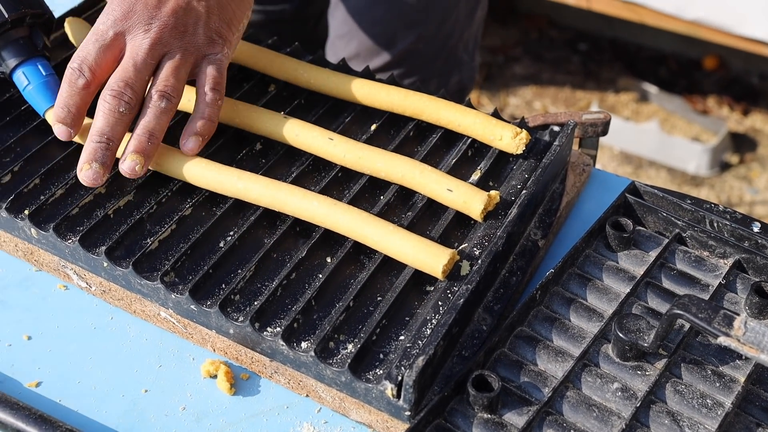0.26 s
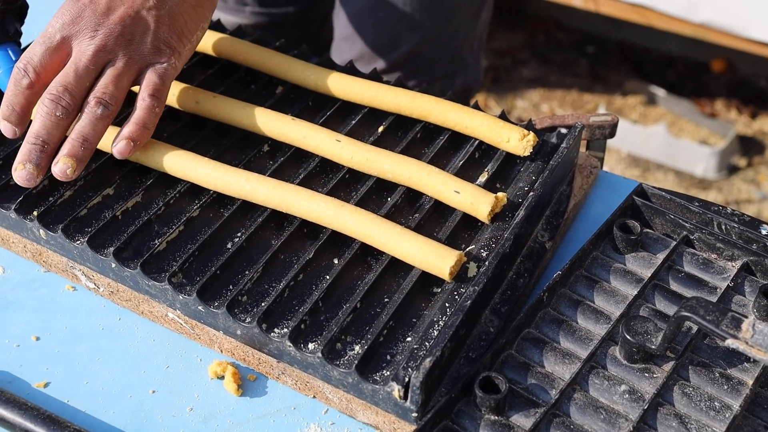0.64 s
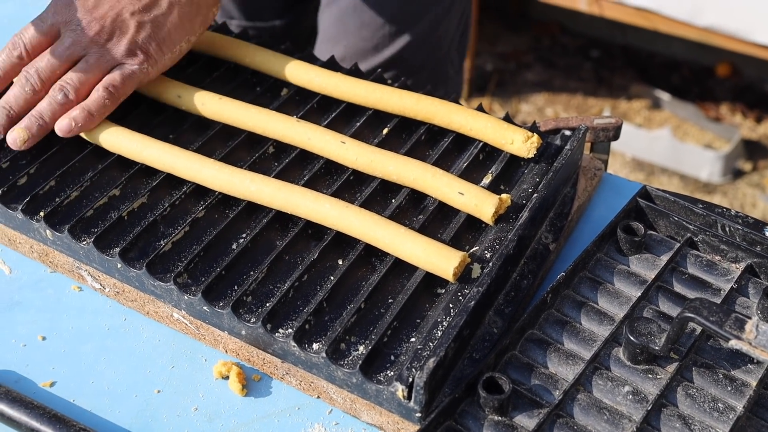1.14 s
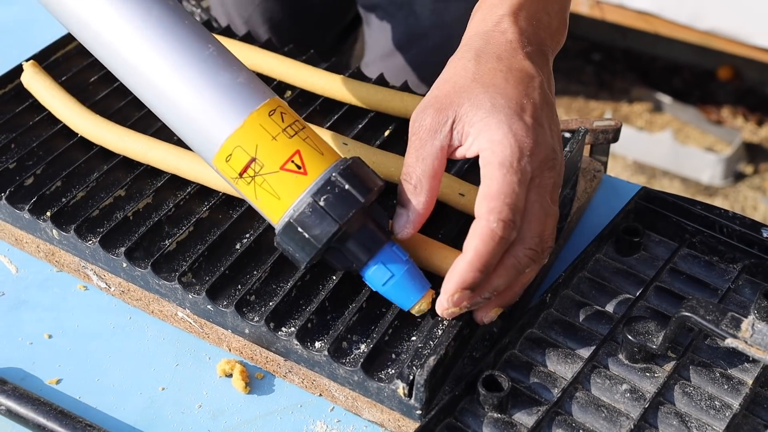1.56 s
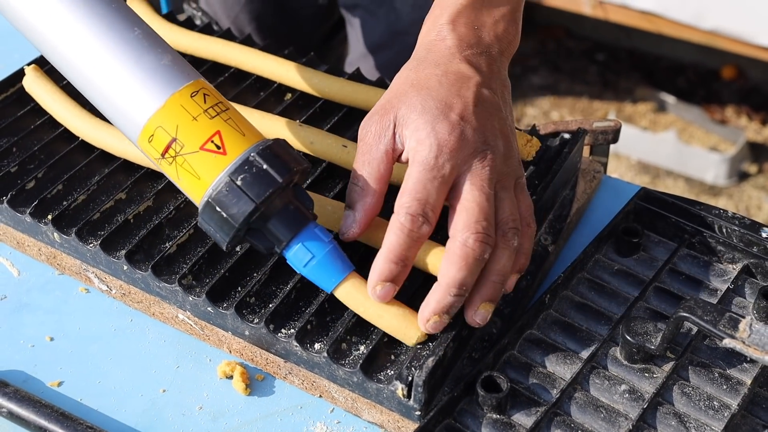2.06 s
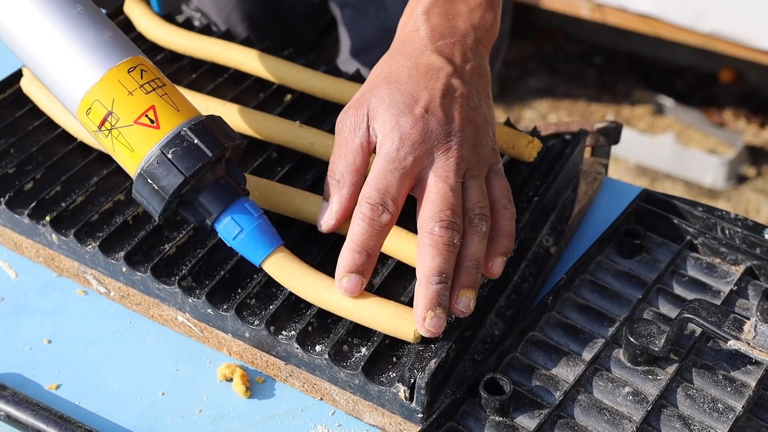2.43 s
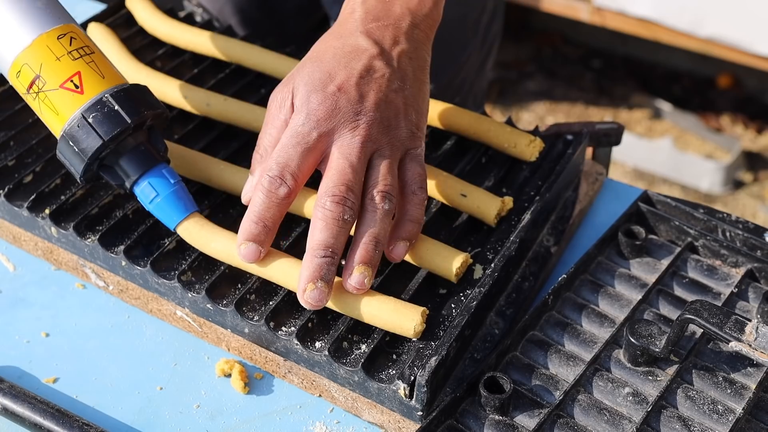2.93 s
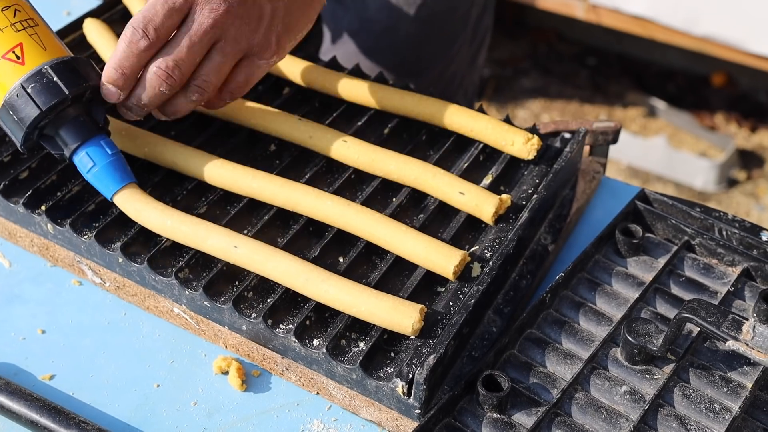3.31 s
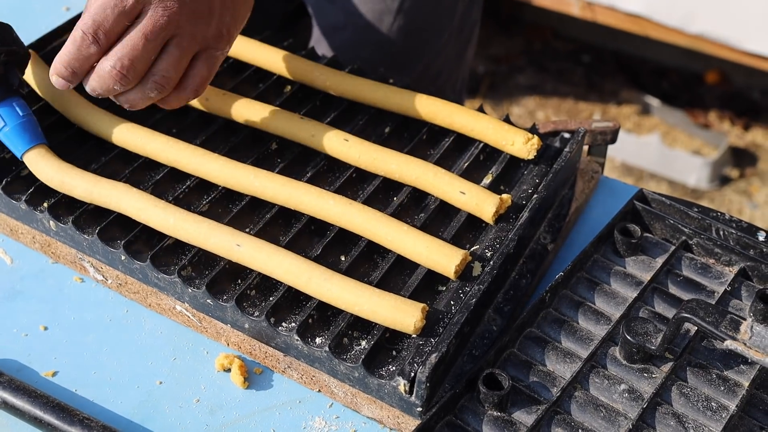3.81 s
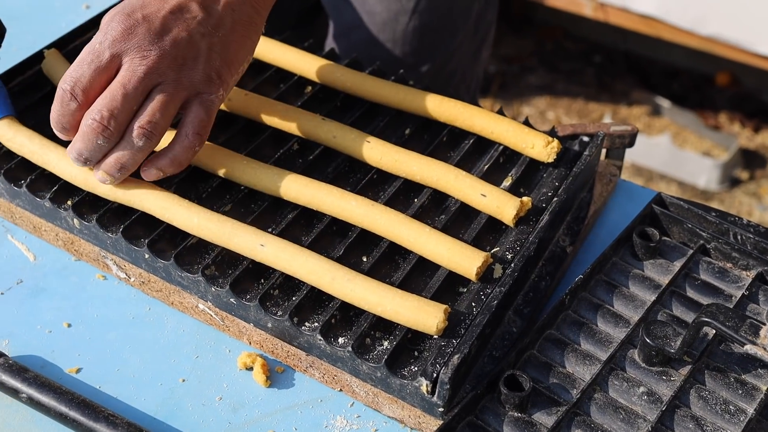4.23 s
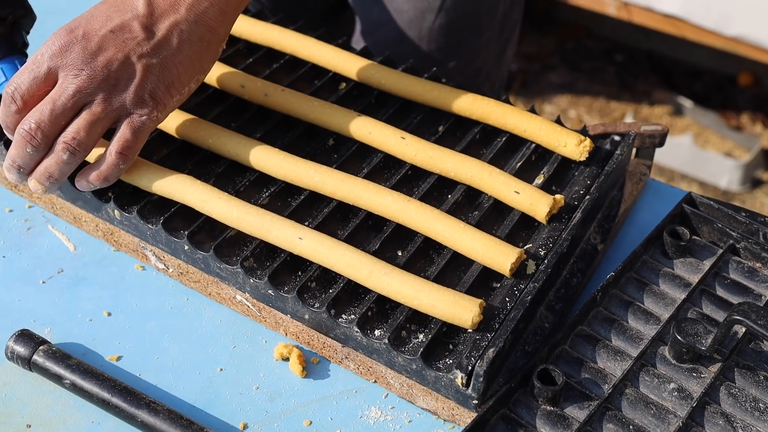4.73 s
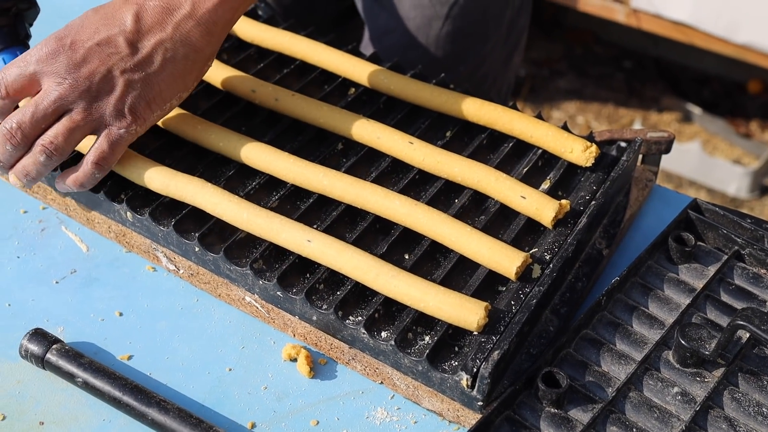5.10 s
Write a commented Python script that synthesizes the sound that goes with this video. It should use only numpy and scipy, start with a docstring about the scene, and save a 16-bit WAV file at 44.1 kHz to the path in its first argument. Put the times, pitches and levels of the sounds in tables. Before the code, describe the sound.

Air-powered gun vents explosively at about one, four and a half and five seconds; soft high hiss and hard clicks fill the gaps.

```python
"""Three air blasts overload the converter; hisses, snaps, knocks, rubs and far chirps fill the gaps outdoors.
A hand works the trigger of an air-driven paste gun beside a stereo microphone.
Blasts, barrel air, rubbing and the yard's hush are shaped noise; trigger snaps and knocks of the gun,
hose and tray are damped modes; bird chirps and a squeak of slipping paste are gliding sines."""
import sys
import numpy as np
from scipy import signal
from scipy.fft import rfft, irfft
from scipy.io import wavfile
from scipy.ndimage import uniform_filter1d

SR = 44100
rng = np.random.default_rng(int(sys.argv[2]) if len(sys.argv) > 2 else 0)


def to_wav(sig):
    """Store sig (one row per channel, or 1-D mono) as 16-bit WAV at the path in sys.argv[1].

    Samples outside -1..1 are clipped; the rate is SR.
    """
    pcm = np.clip(np.atleast_2d(sig), -1, 1) * 32767
    pcm = np.round(pcm).astype(np.int16)
    wavfile.write(sys.argv[1], SR, pcm.T)  # frames by channels


N = 236640

# hiss and rubbing: (frequency [Hz], left-right correlation [-1 to 1])
HISS_LIKENESS = [(60, 0.88), (240, 0.63), (950, 0.98), (3770, 0.24), (15000, 0.12)]


def amp(db):
    """Decibels to gain."""
    return 10 ** (np.asarray(db) / 20)


def left_right(left_over_right_db):
    """Splits a level difference into one dB offset per channel."""
    return np.outer([.5, -.5], left_over_right_db)


def evened(x):
    """Scales to an rms of one."""
    return x / np.sqrt(np.mean(x ** 2) + 1e-20)


def read(points, hz):
    """Reads a table on a log-frequency axis."""
    f, value = np.transpose(points)
    return np.interp(np.log(hz + 1), np.log(f + 1), value)


def add(mix, s, sound):
    """Mixes a two-channel sound in at time s."""
    part = mix[:, round(s * SR):][:, :sound.shape[1]]
    part += sound[:, :part.shape[1]]


def high_pass(x, hz):
    """Second-order bass cut."""
    return signal.sosfilt(signal.butter(2, hz, "high", fs=SR, output="sos"), x)


def noise(tone, likeness, patchy_db, count):
    """Two-channel noise from random short-time spectra with drifting patches, at an rms of one."""
    frames = count // 256 + 5
    hz = np.fft.rfftfreq(1024, 1 / SR)
    a, b, c, d, patches = rng.standard_normal((frames, 513, 5)).T
    patches = uniform_filter1d(patches, size=12, axis=0)
    patches = evened(uniform_filter1d(patches, size=12, axis=1))
    alike = np.clip(read(likeness, hz), -1, 1)[:, None]
    left = a + 1j * b
    right = alike * left + np.sqrt(1 - alike ** 2) * (c + 1j * d)
    spectra = np.array([left, right]) * amp(read(tone, hz)[:, None] + patchy_db * patches)
    return evened(signal.istft(spectra, nperseg=1024, noverlap=768)[1][:, :count])


def hush():
    """The yard's steady background: quiet, partly shared noise."""
    # (frequency [Hz], relative level [dB per Hz])
    tone = [(18, -63), (30, -35), (75, -6), (115, -11), (225, -6.5), (361, -6.5), (401, -2.5), (433, -6.5),
            (469, -4), (771, -8), (1480, -7), (1930, -11), (2380, -5.5), (3340, -8.5), (6100, -10.5),
            (15700, -18)]
    # (frequency [Hz], left-right correlation [-1 to 1])
    likeness = [(60, 0.72), (180, 0.95), (550, 0.73), (1650, 0.51), (4970, -0.31), (15000, -0.21)]
    level_db = -55
    return amp(level_db) * noise(tone, likeness, patchy_db=0.32, count=N)


def whistle(length_s, start_hz, end_hz, peak_db):
    """A thin gliding tone: a sine under a smooth swell, alike in both channels."""
    hz = np.linspace(start_hz, end_hz, round(length_s * SR))
    tone = np.sin(2 * np.pi * np.cumsum(hz) / SR) * np.hanning(len(hz))
    return amp(peak_db) * np.tile(tone, (2, 1))


def blast(open_s, lead_s, leak_db, shut_s, shutting_s, strength_db):
    """A bright jet at the vent, and a roar that dies bass first as the barrel empties."""
    # (frequency [Hz], relative level [dB per Hz])
    jet_tone = [(300, -60), (800, -32), (1600, -23), (2400, -16.5), (3200, -13.5), (4000, -8), (6200, -5.5),
                (7600, -1.5), (9500, -2.5), (12000, -4), (16000, -5.5)]
    # (frequency [Hz], relative level [dB per Hz])
    roar_tone = [(30, 0), (100, -5), (250, 0.5), (700, -0.5), (1300, -2.5), (2500, -2.5), (4500, -4.5),
                 (8000, -22.5), (16000, -42.5)]
    # (frequency [Hz], left-right correlation [-1 to 1])
    jet_likeness = [(60, 0.02), (180, 0.15), (550, 0.041), (1650, 0.74), (4970, -0.13), (15000, -0.3)]
    # (frequency [Hz], left-right correlation [-1 to 1])
    roar_likeness = [(60, -0.14), (380, 0.35), (2380, 0.082), (15000, -0.07)]
    # (frequency [Hz], share that belongs to the jet's top [0 to 1])
    jet_top = [(6000, 0), (11000, 1)]
    roar_bands_hz, bass_fade = (100, 300, 1000, 3000), .17  # fades this share faster for each band down
    closed_db, crack_s, leak_db_per_s, pop_s = -36, .0035, 419, .003
    full_s, jet_sag_db_per_s2 = .05, 899
    roar_drop_db, roar_drop_s, roar_steep = 58, .08, 1.7
    cut_db, trail_db_per_s, trail_s, roar_shut = 39, 120, .2, .25
    top_lift, top_shut_db = .28, -6  # dB of lift per dB of choke; dulling once shut
    jet_left_db, top_left_db = 2, -2.5  # the top's offset adds to the jet's
    roar_left_db, swing_db, swing_s = -1.5, 9, .039

    t = np.arange(-lead_s, shut_s + shutting_s + trail_s, 1 / SR)
    count = len(t)
    hz = np.fft.rfftfreq(count, 1 / SR)

    # the leak swells, then the valve pops wide
    crack_db = closed_db * np.exp(-(t + lead_s) / crack_s)
    gap_db = np.minimum(crack_db + leak_db + leak_db_per_s * t, 0)
    choke_db = gap_db * np.clip(-t / pop_s, 0, 1)
    # shutting cuts the flow; a remnant trails off
    shut = np.sin(np.pi / 2 * np.clip((t - shut_s) / shutting_s, 0, 1)) ** 2
    shut_db = -cut_db * shut - trail_db_per_s * np.maximum(t - shut_s - shutting_s, 0)

    # after full pressure the jet sags ever faster until shutting starts
    spent_s = np.maximum(t - full_s, 0)
    sag_db = jet_sag_db_per_s2 * np.minimum(spent_s, shut_s - full_s) ** 2
    jet_db = strength_db + choke_db - sag_db + shut_db
    top_db = top_shut_db * shut - top_lift * choke_db + left_right(top_left_db)
    jet = noise(jet_tone, jet_likeness, patchy_db=1.5, count=count)
    top = irfft(rfft(jet) * read(jet_top, hz), count)
    jet = amp(jet_db) * (jet + (amp(top_db) - 1) * top)  # a narrow gap hisses higher

    # the roar is weak through a narrow gap and collapses after full pressure
    collapse_db = roar_drop_db * (1 - np.exp(-spent_s / roar_drop_s))
    roar_db = roar_steep * choke_db - collapse_db + roar_shut * shut_db
    spectrum = rfft(noise(roar_tone, roar_likeness, patchy_db=1.5, count=count))
    roar = 0
    for k, own in enumerate(np.eye(len(roar_bands_hz))[::-1]):  # highest band first
        share = read(list(zip(roar_bands_hz, own)), hz)  # overlapping bands that sum to one
        band = irfft(spectrum * share, count)
        roar = roar + amp(strength_db + (1 + k * bass_fade) * roar_db) * band
    # the dying roar swings left and back
    pan_db = roar_left_db + swing_db * spent_s / swing_s * np.exp(1 - spent_s / swing_s)
    return open_s - lead_s, jet * amp(left_right(jet_left_db)) + roar * amp(left_right(pan_db))


def rubbing():
    """Hand and paste dragged along the tray: a low, lumpy rustle swelling and fading with each stroke."""
    # (middle [s], half length [s], level [dB])
    stroke_rows = [(1.55, 0.31, -59.5), (2.45, 0.24, -61.5), (3.5, 0.41, -63.5), (5.1, .25, -62.5)]
    # (frequency [Hz], relative level [dB per Hz])
    tone = [(100, -25), (200, -4), (450, -1), (900, -0.5), (2000, -4), (4000, -16), (8000, -34)]
    t = np.arange(N) / SR
    strokes = sum(amp(db) * np.exp(-((t - s) / half_s) ** 2) for s, half_s, db in stroke_rows)
    return strokes * noise(tone, HISS_LIKENESS, patchy_db=2, count=N)


def knock(level_db, hz, t60_s):
    """A dull tap: a damped note with weaker, shorter overtones."""
    t = np.arange(6000) / SR
    ratio = np.array([[1], [1.6], [2.5], [4.1]])
    note_db = -5 * np.log2(ratio) - 60 * ratio ** .5 * t / max(t60_s, .005)
    notes = amp(note_db) * np.sin(2 * np.pi * ratio * hz * t)
    attack = np.minimum(t / .0013, 1)
    return amp(level_db) * np.tile(notes.sum(0), (2, 1)) * attack


def hiss(row, tone):
    """Turbulent air through a narrow valve, coloured by the passages around it."""
    close_db_per_s, left_db = 168, 2.5
    s, rise_s, level_db, steady_s, fade_db_per_s, close_s, length_s = row
    t = np.arange(0, length_s, 1 / SR)
    fade_db = fade_db_per_s * np.maximum(t - steady_s, 0)
    closing_db = close_db_per_s * np.maximum(t - close_s, 0)
    flow_db = level_db - fade_db - closing_db
    rise = (1 - np.exp(-t / rise_s)) ** 2
    air = noise(tone, HISS_LIKENESS, patchy_db=1.7, count=len(t))
    air = air * signal.windows.tukey(len(t), .02)
    return s, air * rise * amp(flow_db + left_right(left_db))


def snap(peak_db, treble_db, left_db, tail_db):
    """Trigger modes ring some two milliseconds until the finger damps them; surfaces scatter a tail."""
    # (frequency [Hz], level before tilt [dB])
    trigger_modes = [(590, -2.5), (950, -7), (1350, 0.5), (1600, -7.5), (2300, 1), (2800, -6.5),
                     (3600, -1.5), (4600, -2), (5600, -6), (6300, -1), (7400, -7), (8500, -4.5), (9400, 0),
                     (10500, -6.5), (11900, -6.5), (13000, -11), (14100, -11), (15200, -17)]
    t = np.arange(3000) / SR
    hz, db = np.transpose(trigger_modes)[:, :, None]
    tilt_db = treble_db * np.clip(np.log2(hz / 2000) / 2, 0, 1)
    start_s = rng.uniform(0, .00077, hz.shape) * (hz > 2000)  # parts rattle into place at scattered moments
    modes = amp(db + tilt_db) * np.sin(2 * np.pi * hz * (t - start_s)) * (t >= start_s)
    ring = modes.sum(0) * np.exp(-(t / .0019) ** 3)
    ring = high_pass(ring, 260)  # a small part radiates little bass
    scatter = rng.standard_normal((2, len(t))) * amp(-60 * t / .045) * (t > .001)
    scatter = scatter / np.linalg.norm(scatter[0])
    tail = signal.fftconvolve(ring[None], scatter, axes=1)[:, :len(t)]
    return amp(peak_db + left_right(left_db)) * (ring + amp(tail_db) * tail) / abs(ring).max()


def scene():
    """All sources over the hush of the yard."""
    # bird: (start [s], length [s], start pitch [Hz], end pitch [Hz], peak [dB])
    chirps = [(.31, .025, 6100, 5800, -60), (.54, .03, 6300, 5950, -62), (.565, .025, 5900, 5900, -60)]
    # paste slipping on the tray: (start [s], length [s], start pitch [Hz], end pitch [Hz], peak [dB])
    squeaks = [(2.525, .08, 740, 1090, -54)]
    # vent: (fully open [s], valve cracks this early [s], leak level [dB], starts shutting after [s],
    # shutting takes [s], strength [dB])
    blasts = [(.984, .016, -5, .107, .115, -1), (4.4719, .040, -10, .131, .06, -0.5),
              (5.2225, .007, -5, .125, 0.065, -1)]
    # gun, hose and tray: (start [s], level [dB], pitch [Hz], t60 [s])
    knocks = [(1.25, -45, 560, .06), (1.613, -39, 406, .02), (1.661, -39, 188, .09),
              (1.662, -30.5, 275, .075), (1.692, -43.5, 248, .033), (1.782, -51, 218, .04),
              (2.065, -44, 5200, .007), (2.171, -47, 372, .06), (2.2, -48, 363, .05),
              (2.481, -39.5, 704, .015), (3.211, -36.5, 850, .018), (3.316, -46, 479, .027),
              (3.332, -45, 355, .04), (3.5035, -41, 690, .02), (3.528, -35, 796, .014),
              (3.755, -43.5, 403, .02), (3.765, -47, 228, .05), (4.087, -41.5, 2097, .014),
              (4.358, -33.5, 640, .016), (4.6162, -10, 430, .015), (4.9, -40, 550, .018),
              (4.98, -50, 210, .075), (5.022, -49, 207, .07)]
    # air entering the barrel, one row a pull: (start [s], rise [s], level [dB], steady for [s],
    # fade [dB/s], valve closes after [s], ends after [s])
    fill = (1.358, .037, -33, .3, 43, .54, .69)
    refill = (4.64, .052, -38.5, .32, 24.5, .6, .58)
    # air seeping on while the paste is pushed out: same columns
    seep = (1.8, .04, -53.5, .2, 5.5, 2.4, 2.6)
    # (frequency [Hz], relative level [dB per Hz])
    fill_tone = [(1200, -34), (2500, -23.5), (3900, -14.5), (6000, -16.5), (6800, -11), (9500, -12),
                 (11300, -13), (12000, -11.5), (12400, 0), (12800, -9), (13500, -8.5), (14000, -13),
                 (14600, -15), (16000, -18.5)]
    # (frequency [Hz], relative level [dB per Hz])
    refill_tone = [(1200, -35), (2400, -17), (4300, -8), (5500, -15), (7300, -3.5), (8500, -10),
                   (10500, -4.5), (11300, -15.5), (12200, -1), (12700, -1.5), (13000, -9), (13700, -5),
                   (14500, -14), (15700, -25)]
    # (frequency [Hz], relative level [dB per Hz])
    seep_tone = [(3000, -30), (6000, -16), (10100, -11), (11700, -12), (12500, -3), (13100, -9),
                 (13900, -2), (14200, -4), (14550, 0), (15200, -5), (16000, -12)]
    # trigger: (start [s], ring peak [dB], treble over bass [dB], left over right [dB], tail [dB])
    snaps = [(3.4575, -1, -1, 0, -8), (3.6777, -10.5, -10.5, 0.5, -7), (1.6575, -27, -12, 1, -2)]

    mix = hush() + rubbing()
    for row in blasts:
        add(mix, *blast(*row))
    for row, tone in ((fill, fill_tone), (refill, refill_tone), (seep, seep_tone)):
        add(mix, *hiss(row, tone))
    for table, source in ((snaps, snap), (knocks, knock), (chirps, whistle), (squeaks, whistle)):
        for s, *row in table:
            add(mix, s, source(*row))
    return mix


def record(dry):
    """The microphone drops deep bass, the converter clips the blasts, a steep low-pass limits the band."""
    low_cut_hz, edge_hz = 90, 15820
    clipped = np.clip(high_pass(dry, low_cut_hz), -.97, .97)
    edge = signal.firwin(1535, edge_hz, window=("kaiser", 9), fs=SR)
    return signal.oaconvolve(clipped, edge[None], "same")


dry = scene()
out = record(dry)
to_wav(out)
```